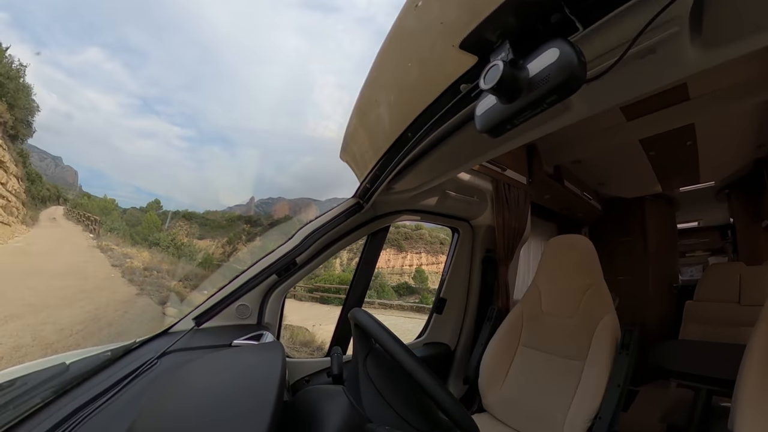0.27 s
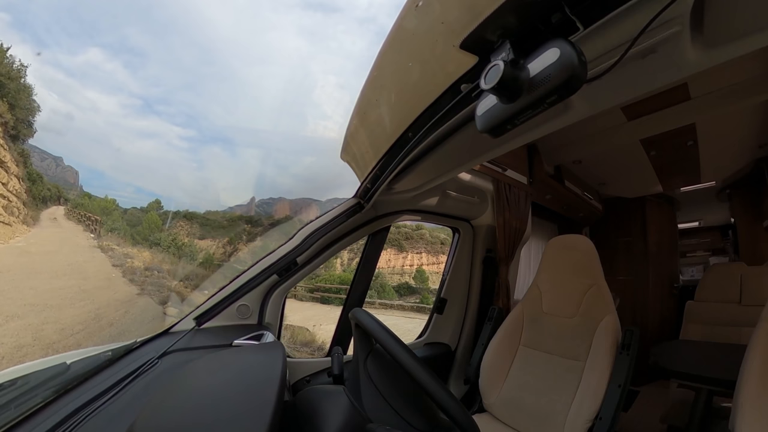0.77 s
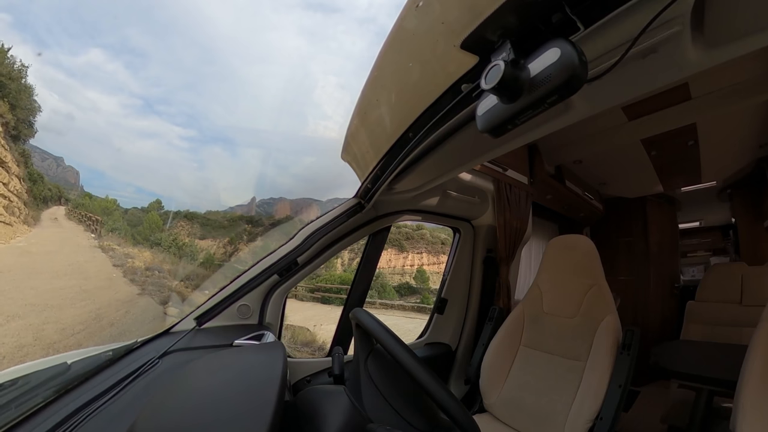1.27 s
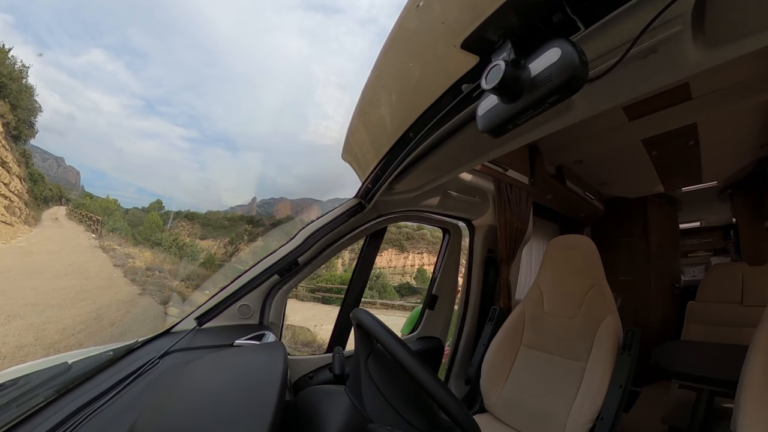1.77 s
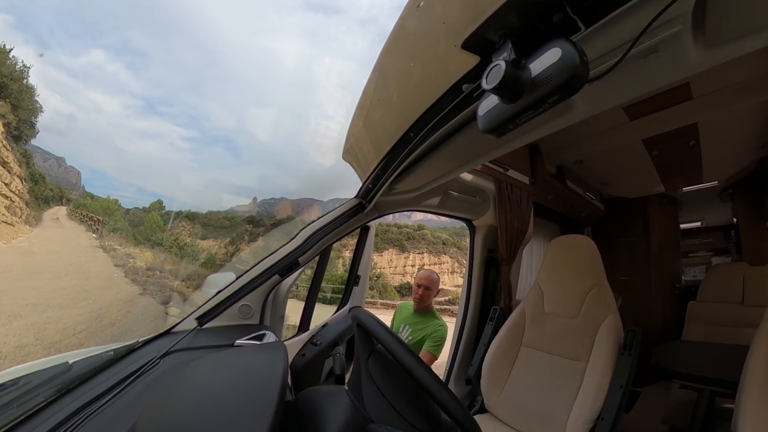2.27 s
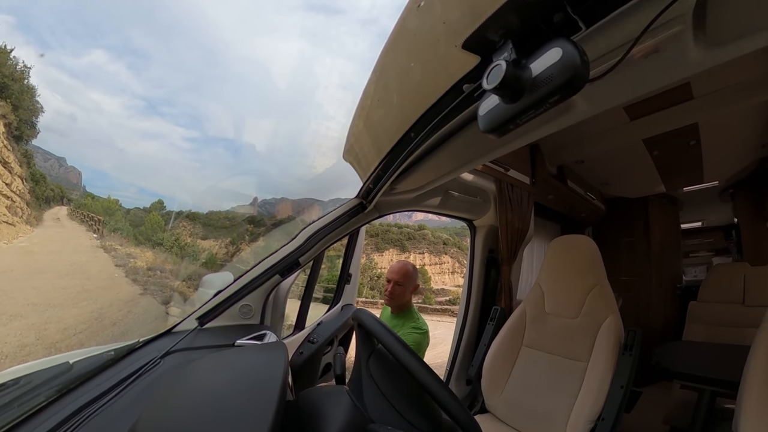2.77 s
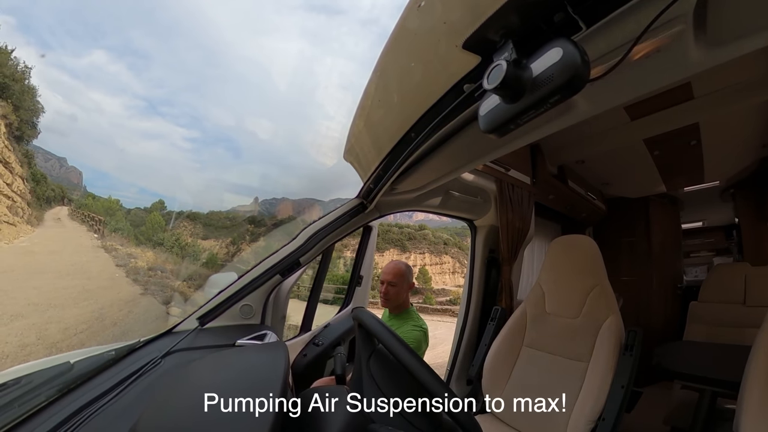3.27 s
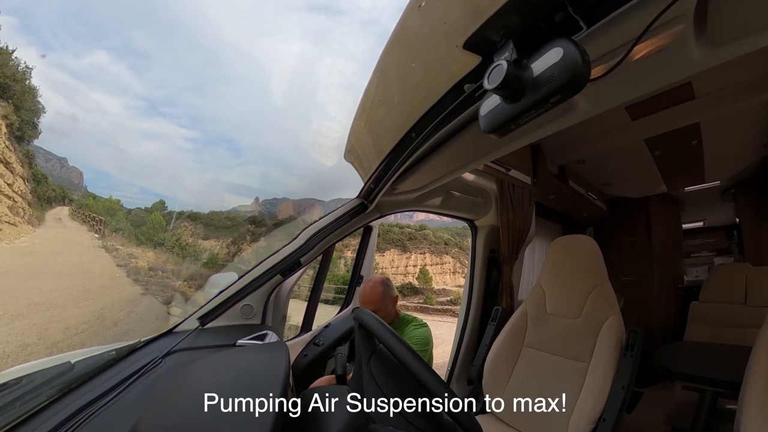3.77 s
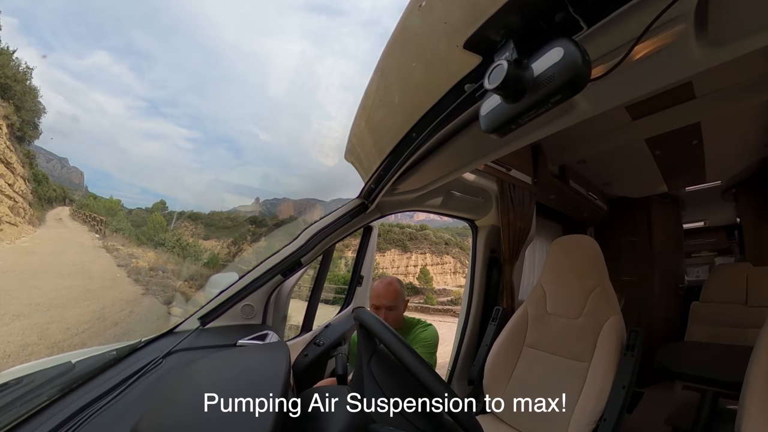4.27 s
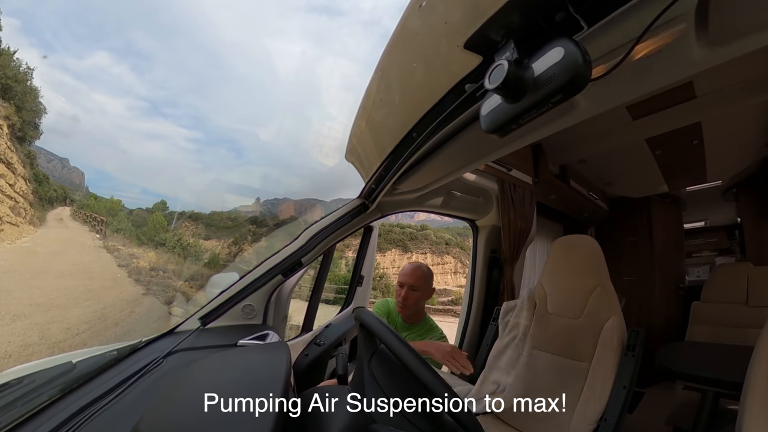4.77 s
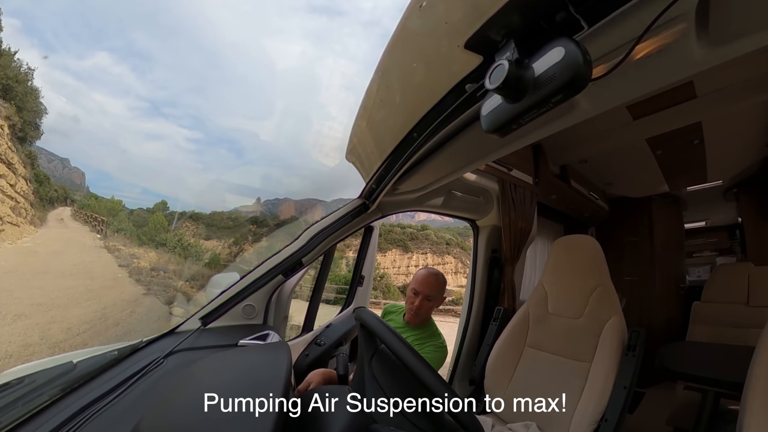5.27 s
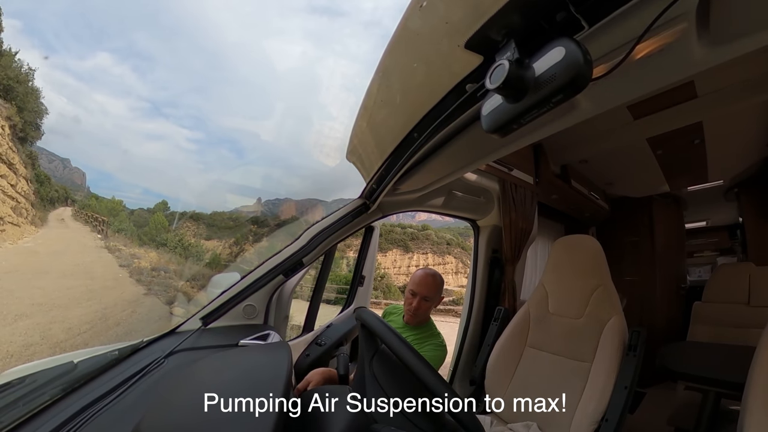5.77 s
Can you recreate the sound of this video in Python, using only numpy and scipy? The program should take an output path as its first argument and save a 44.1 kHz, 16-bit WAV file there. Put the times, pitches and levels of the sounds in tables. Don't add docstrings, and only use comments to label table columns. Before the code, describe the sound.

Inside a van cab, a diesel idles boomily; the door clunks open, the boom thins, then a small piston compressor shudders on and hums loudly.

```python
import sys
import numpy as np
from scipy import signal
from scipy.fft import rfft, irfft
from scipy.io import wavfile
from scipy.ndimage import uniform_filter1d

SR = 44100
rng = np.random.default_rng(int(sys.argv[2]) if len(sys.argv) > 2 else 0)


def int16_out(signal):
    q = np.round(np.clip(np.atleast_2d(signal).T, -1, 1) * 32767)
    wavfile.write(sys.argv[1], SR, q.astype(np.int16))


def volts_from_decibels(level):
    exponent = np.asarray(level, float) / 20
    return 10 ** exponent


N = 265041
T = np.arange(N) / SR


def noise(n=N):
    return rng.standard_normal(n)


def evened(x):
    return x / np.sqrt(np.mean(x ** 2) + 1e-20)


def curves(rows):
    s, *columns = np.transpose(rows)
    return [np.interp(T, s, c) for c in columns]


def wander(rate_hz):
    knots = noise(244)
    return 1.22 * np.interp(T * rate_hz, np.arange(len(knots)), knots)


def pulses(turns):
    return np.diff(np.floor(turns), prepend=0)


def colour(x, points, lo=0, hi=SR):
    hz = np.fft.rfftfreq(len(x), 1 / SR)
    f, db = np.transpose(points)
    z = rfft(x) * volts_from_decibels(np.interp(np.log(hz + 1), np.log(f + 1), db))
    in_band = (hz > lo) * (hz < hi)
    return irfft(z, len(x)) / np.std(irfft(z * in_band, len(x)))


def ring(x, modes):
    out = np.zeros(len(x))
    for hz, width_hz, db in modes:
        r = np.exp(-np.pi * width_hz / SR)
        poles = [1, -2 * r * np.cos(2 * np.pi * hz / SR), r * r]
        out += volts_from_decibels(db) * (1 - r) * signal.lfilter([1, 0, -1], poles, x)
    return out


def dull(x, hz):
    return signal.sosfilt(signal.butter(4, min(hz, 20000), fs=SR, output="sos"), x)


def burst(s, hold_s, db, rise_db_per_s, fall_db_per_s):
    early_s, late_s = np.maximum(s - T, 0), np.maximum(T - s - hold_s, 0)
    return volts_from_decibels(db - rise_db_per_s * early_s - fall_db_per_s * late_s)


def add(mix, s, sound):
    part = mix[round(s * SR):][:len(sound)]
    part += sound[:len(part)]


# (start [s], whine over effort [dB], valve ring over effort [dB],
# loose cover over valve ring [dB], turn-taking share)
STAGES = [
    (2.9, -19, -12, -8, 0),
    (3.69, -6.5, -15, -6, .7),
    (4.2, -5, -13, -13, 0),
    (4.4, -1.5, -13, -16, 0),
]


def stages():
    rows, glide_s = np.array(STAGES), 0.05
    index = np.maximum(np.searchsorted(rows[:, 0], T) - 1, 0)
    return uniform_filter1d(rows[index, 1:], round(glide_s * SR), axis=0).T


# (multiple of shaft, level [dB])
STROKE = [(1, -10), (2, 0), (3, -2), (4, -9), (5, -10), (6, -23), (7, -23), (8, -16), (9, -14), (10, -4),
          (11, -20), (12, -29), (13, -28), (14, -26), (15, -20), (16, -30), (17, -28), (18, -21), (19, -15),
          (20, -16), (21, -16), (22, -22), (23, -29), (24, -26), (25, -27), (26, -30)]


def strokes(turns, thrum_db, effort_db):
    whine_db, valve_db, loose_db, uneven = stages()
    whine_db = whine_db + effort_db + 0.68 * wander(12)
    valve_db = valve_db + effort_db + 0.96 * wander(11)
    groups = np.zeros((4, N))
    for k, db in STROKE:
        group = 1 if k == 1 else int(k > 7.5) + int(k > 12.5) + int(k > 22.5)
        lag = 0.21 * k * k if k < 17.5 else 0.16 * (k - 20) ** 2
        groups[group] += volts_from_decibels(db + wander(9)) * np.cos(2 * np.pi * (k * turns + lag))
    turn_taking = np.clip(uneven, 0, 1) * np.cos(np.pi * turns)
    groups[2:] *= [1 + turn_taking, 1 - turn_taking]
    levels_db = thrum_db + 1.5, whine_db - 0.6, valve_db + 1.14, valve_db + loose_db
    return sum(volts_from_decibels(db) * evened(g) for db, g in zip(levels_db, groups))


# (frequency [Hz], level [dB/Hz])
AIR = [(1180, -3.5), (2000, -1), (2700, -6.5), (2960, -3.5), (3230, -8.5), (3960, -5.5), (4430, -1),
       (4750, -6.5), (5210, -5.5), (5680, -5), (7340, -13.5), (8940, -11), (15400, -54)]
# (frequency [Hz], width [Hz], level [dB])
REEDS = [(2030, 32, 6), (2400, 63, 2), (2940, 67, -7), (3660, 230, -2), (4397, 54, 10.5), (4970, 32, -17),
         (5256, 120, 8.5), (5530, 33, -14), (6220, 110, 1), (8600, 60, -10), (10150, 88, -30),
         (11700, 83, -23)]
# (frequency [Hz], width [Hz], level [dB])
BLOW_BY = [(3830, 610, 0), (2950, 300, -8)]
# (multiple of shaft, level under hiss [dB])
SINGING = [(61, -13), (69, -16), (72, -16), (74, -16)]


def valve_air(turns):
    taps = pulses(turns) * volts_from_decibels(1.8 * noise())
    rattle = evened(signal.oaconvolve(taps, noise(1500) * volts_from_decibels(-60 * T[:1500] / 0.2))[:N])
    reeds = evened(dull(ring(rattle + 0.2 * noise(), REEDS), hz=11300))
    singing = sum(volts_from_decibels(db + 1.5 * wander(20)) * np.cos(2 * np.pi * k * turns) for k, db in SINGING)
    blow_by = evened(dull(ring(noise() + rattle, BLOW_BY), hz=6000))
    blow_by_db = -4 - 7 * np.maximum(T - 3.7, 0)
    hiss = colour(noise() + 0.86 * rattle, AIR, lo=1570, hi=11000)
    return hiss + 0.54 * reeds + volts_from_decibels(4.0) * singing + volts_from_decibels(blow_by_db) * blow_by


# (time [s], shaft [Hz], effort [dB])
PUMP = [
    (2.9, 66.14, -22),
    (3.04, 68.3, -19),
    (3.12, 72.58, -18.5),
    (3.7, 72.85, -18.5),
    (4.45, 72.77, -19.5),
    (4.9, 73.15, -20.5),
    (5.6, 73.36, -21),
    (6.01, 72.9, -23),
]
# (frequency [Hz], level [dB/Hz])
RASP = [(35, -47), (60, -26), (97, -23), (139, -6), (219, -6.5), (486, -7.5), (729, 1), (865, -10.5),
        (1490, -8), (2500, -34), (3250, -70), (5500, -120)]


def compressor():
    shaft_hz, effort_db = curves(PUMP)
    strain_db = 0.2 * np.maximum(72.8 - shaft_hz, 0)
    hiss_db = -33 + 0.95 * (effort_db + 19)
    turns = np.cumsum(shaft_hz * (1 + 0.0008 * wander(15))) / SR
    gate = 1 + 0.3 * np.cos(2 * np.pi * turns) + 0.14 * np.cos(4 * np.pi * turns)
    tones = strokes(turns, effort_db + strain_db, effort_db)
    rasp = volts_from_decibels(-30.5) * colour(noise(), RASP) * np.sqrt(gate)
    air = volts_from_decibels(hiss_db - 5.0) * gate * valve_air(turns)
    return np.clip((T - PUMP[0][0]) / 0.067, 0, 1) * (tones + rasp + air)


# (hold [s], level [dB], rise [dB/s], fall [dB/s])
SHUDDER = (.02, -6.5, 200, 230)
# (frequency [Hz], level [dB/Hz])
SHAKEN = [(47, -42), (80, -25), (205, 0.5), (327, -13.5), (378, -10), (616, -8), (725, -7), (793, -11),
          (900, -15.5), (1180, -19.5), (1340, -17), (2070, -28), (6000, -46), (7800, -48), (13200, -120)]


def shudder():
    peak_s, catch_s, blows_hz = 2.965, 3.036, 197
    turns = np.cumsum(blows_hz * (1 + 0.05 * wander(35))) / SR
    blows = pulses(turns) * volts_from_decibels(2.7 * noise())
    shaken = colour(evened(blows) + 0.9 * noise(), SHAKEN, lo=150, hi=2000)
    start = np.clip((T - PUMP[0][0]) / 0.0038, 0, 1)
    stop = np.clip((catch_s + 0.0054 - T) / 0.012, 0, 1)
    return start * stop * burst(peak_s, *SHUDDER) * shaken


# (peak [s], hold [s], level [dB], rise [dB/s], fall [dB/s])
PUFFS = [
    (1.939, 0.07, -43, 1500, 350),
    (2.879, 0.0027, -22, 1700, 750),
    (3.37, 0.02, -19, 433, 900),
    (.83, 0.18, -61.5, 303, 40),
]
# (frequency [Hz], level [dB/Hz])
PUFF_TONES = [
    [(290, -32), (500, -3), (686, -4), (875, -11), (1200, -2), (1370, -15), (5660, -22.5), (10000, -40.5),
     (15400, -74)],
    [(880, -33), (1500, 2.5), (2400, -22), (2540, -1.5), (2880, -12.5), (3650, -2), (7150, -2), (9390, -7),
     (15400, -51.5)],
    [(1180, -21), (2000, -9), (3150, -15.5), (3580, -5), (5080, -1.5), (7090, -10), (9410, -10.5),
     (14600, -48), (15400, -32.5)],
]


def puffs():
    out = np.zeros(N)
    for row, tone in zip(PUFFS, PUFF_TONES + PUFF_TONES[1:2]):
        flutter = volts_from_decibels(1.7 * wander(37.84))
        out += burst(*row) * flutter * colour(noise(), tone, lo=3000, hi=12000)
    return out


# (time [s], crack [dB], thud [dB], thud [Hz], thud t60 [s])
KNOCKS = [(1.44, -48, -17.5, 72, .15), (1.518, -48, -13, 83, 0.1), (1.553, -46, -18, 101, 0.09),
          (1.596, -18.5, -17, 154.6, 0.65), (1.622, -24.5, -18, 209.5, 0.16),
          (1.685, -21.5, -23, 612, 0.092), (1.694, -8.5, -3.5, 414, 0.098), (1.711, -21, 1, 179, 0.076),
          (1.703, -28, -10, 290, 0.1), (1.733, -28.5, -15, 241, 0.1), (1.764, -28.5, -5.5, 156, 0.092),
          (1.795, -52, -19, 157.6, 0.39), (2.078, -16, -12.5, 235, 0.097), (2.087, -29, -9.5, 394, 0.13),
          (2.108, -35, -12, 143, 0.18), (4.07, -45, -26, 191.8, .5), (4.94, -48, -24, 176.5, 0.58)]
# (frequency [Hz], level [dB/Hz])
CRACK = [(110, -29), (290, 9), (500, 3), (883, -9.5), (1580, -5), (1800, -13), (2960, -16.5), (3140, -20),
         (3670, -20.5), (6210, -30), (15000, -59.5)]
# (frequency [Hz], width [Hz], level [dB])
LATCH = [(1150, 130, 17), (1490, 81, 1), (2280, 85, -12), (2870, 100, 2), (3420, 97, -13),
         (4080, 200, -9.5), (4840, 110, -18)]
# (frequency [Hz], width [Hz], level [dB])
PANEL = [(90, 25, -15), (142, 96, 30), (205, 9.8, -7), (276, 120, -8), (454, 41, -9), (695, 54, -32)]


def door():
    out, t = np.zeros(N), T[:SR // 3]
    crack_t60_s, cabin_ring_db = 0.098, -4.5
    for s, crack_db, thud_db, hz, thud_t60_s in KNOCKS:
        blow = noise(len(t))
        latch = evened(dull(ring(blow[::-1], LATCH), hz=6150))
        crack = (colour(blow, CRACK, lo=1280, hi=9000) + 0.93 * latch) * (1 - np.exp(-t / 0.002))
        panel = evened(dull(ring(noise(len(t)), PANEL), hz=900))
        thud = (1.3 * np.sin(2 * np.pi * hz * t) + 0.3 * panel) * (1 - np.exp(-t / 0.005))
        thud = signal.sosfilt(signal.butter(2, hz / 2, "high", fs=SR, output="sos"), thud)
        crack *= volts_from_decibels(crack_db - 6.0 - 60 * t / crack_t60_s)
        thud *= volts_from_decibels(thud_db + 2.5 - 60 * t / thud_t60_s)
        add(out, s - 0.002, crack + thud)
    return out + volts_from_decibels(cabin_ring_db) * ring(out, BOOM)


# (time [s], peak [dB], centre [Hz], t60 [s])
TICKS = [(.382, -45, 3040, 0.035), (.677, -40, 750, 0.039), (1.2, -38, 2100, 0.088),
         (1.209, -39, 3500, 0.082), (1.863, -57, 3220, 0.054), (2.624, -41, 3640, 0.097),
         (2.924, -23.5, 1820, 0.083), (2.951, -26, 900, 0.046), (4.114, -21, 1870, 0.076),
         (4.114, -22.5, 3600, 0.07), (4.117, -47, 5370, 0.057), (4.878, -31.5, 3000, .06)]


def ticks():
    out, t = np.zeros(N), T[:SR // 3]
    for s, db, hz, t60_s in TICKS:
        modes = [(hz, hz / 4, 0), (5200, 2500, -20)]
        tick = evened(dull(ring(noise(len(t)), modes), hz=6900))
        add(out, s - 0.001, tick * (1 - np.exp(-t / 0.0023)) * volts_from_decibels(db - 60 * t / t60_s))
    return out


# (multiple of firing, level [dB], share that follows the boom)
FIRING = [(1, -8, 0.038), (2, 1.5, 0.24), (3, -3, 0.4), (4, -6.5, 0.23), (5, -3, 0.41), (7.5, -4.5, 1),
          (7.75, 4, 1), (9, 0.5, 1), (10, 1.5, 0.85), (12.25, -7.5, 0)]
CYLINDERS_DB = [3.5, -8.5, 0.5, 0]
# (frequency [Hz], width [Hz], level [dB])
BOOM = [(207, 15.2, 2), (230, 6.8, -11.5), (264, 13, 2.5), (314, 49, -12.5), (443, 17, -11)]
# (frequency [Hz], level [dB/Hz])
HUM = [(21, -26.5), (36, -14), (59, -4.5), (162, -6), (220, 0), (263, -2), (376, -8.5), (599, -12.5),
       (667, -9.5), (937, -16), (1490, -19.5), (1920, -33), (2600, -35.5), (3380, -69), (5720, -120)]
# (frequency [Hz], level [dB/Hz])
WASH = [(940, -31), (1600, 0), (1900, -6.5), (2100, -6.5), (2780, -7.5), (3650, -7.5), (4240, -13.5),
        (5430, -15.5), (9590, -30.5), (11500, -51.5), (15000, -77.5), (22000, -120)]


def engine():
    firing_hz = 26.57
    orders_db, boom_db, wash_db, hiss_db = cabin()
    turns = np.cumsum(firing_hz * (1 + 0.0033 * wander(3))) / SR
    swing_db = boom_db - boom_db[:SR].mean()
    orders = np.zeros(N)
    for k, db, share in FIRING:
        gain = volts_from_decibels(db + share * swing_db + 1.5 * wander(13))
        orders += gain * np.cos(2 * np.pi * (k * turns + 0.1312 * k * k))
    strength_db = np.take(CYLINDERS_DB, turns.astype(int) % 4) + 2.1 * noise()
    boom = evened(ring(pulses(turns) * volts_from_decibels(strength_db), BOOM)) + 1.5 * evened(ring(noise(), BOOM))
    boom = evened(dull(boom, hz=540))
    throb = 1 + 0.12 * np.cos(2 * np.pi * turns)
    low = volts_from_decibels(wash_db + 1.1 * wander(14)) * colour(noise(), HUM, lo=483, hi=1900)
    high = volts_from_decibels(hiss_db + 0.79 * wander(18)) * colour(noise(), WASH, lo=1800, hi=19000)
    return np.sqrt(2) * volts_from_decibels(orders_db) * orders + volts_from_decibels(boom_db - 2.0) * boom + throb * (low + high)


# (time [s], opening [0-1])
DOOR = [
    (0, 0.02),
    (1.42, 0.04),
    (1.5, 0.33),
    (1.78, 0.3),
    (1.86, 0.94),
    (2.0, 0.87),
    (2.5, 0.93),
    (2.85, 0.98),
    (6.01, 0.95),
]
# (orders [dB], boom [dB], wash [dB], hiss [dB])
SHUT_DB = (-32, -23, -36, -53.5)
OPEN_DB = (-33.5, -33.5, -37, -46)
# (time [s], depth [dB])
LULLS = [(0, -14), (.17, -3.5), (1.06, -0.5), (1.18, -6), (1.31, -5), (1.47, -12), (2.2, -1), (2.46, -24),
         (2.59, -23), (2.74, -10), (2.86, -12)]


def cabin():
    opening = curves(DOOR)[0]
    orders_db, boom_db, wash_db, hiss_db = (a + (b - a) * opening for a, b in zip(SHUT_DB, OPEN_DB))
    lull_db = sum(db * np.exp(-((T - s) / 0.03) ** 2) for s, db in LULLS)
    swing_db = -1.5 * np.exp(-((T - 2.3) / 0.37) ** 2)
    return orders_db + swing_db, boom_db + lull_db, wash_db, hiss_db


def ducking(x):
    limit_db, squeeze, recover_db_per_s, react_s = -14, 0.4, 12, 0.068
    power_db = 10 * np.log10(abs(uniform_filter1d(x[0] ** 2, size=1300)) + 1e-12)
    recovery_db = recover_db_per_s * T
    held_db = np.maximum.accumulate(power_db + recovery_db) - recovery_db
    over_db = np.maximum(held_db - limit_db, 0)
    keep = np.exp(-1 / (react_s * SR))
    return volts_from_decibels(-squeeze * signal.lfilter([1 - keep], [1, -keep], over_db))


def scene():
    return (compressor() + shudder() + puffs() + door() + ticks() + engine())[None]


def roll_off(x):
    return signal.sosfilt(signal.butter(12, 15600, fs=SR, output="sos"), x)


def record(dry):
    mix = 0.92 * np.tanh(ducking(dry) * dry / 0.97)
    return roll_off(mix)


dry = scene()
out = record(dry)
int16_out(out)
```